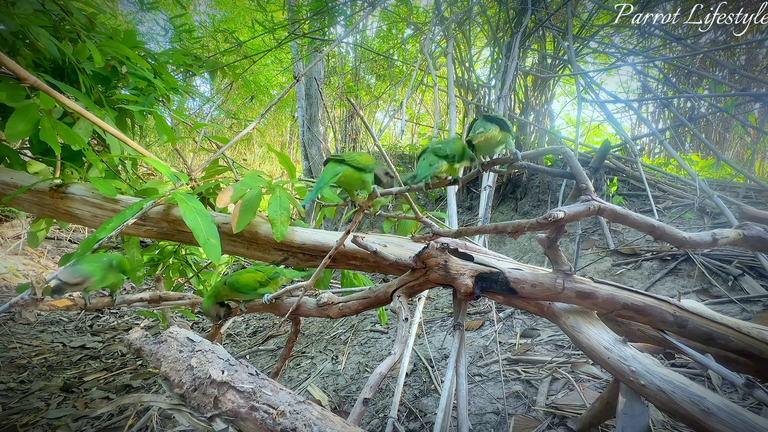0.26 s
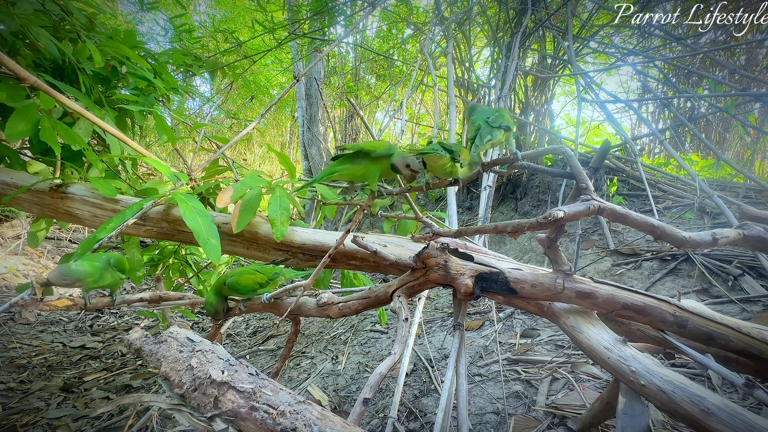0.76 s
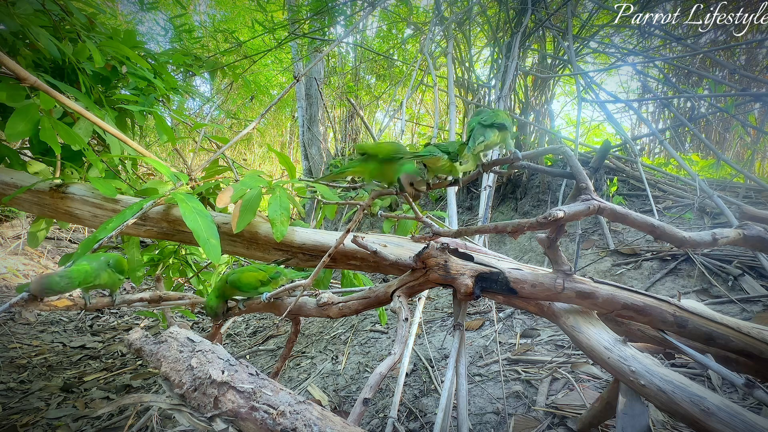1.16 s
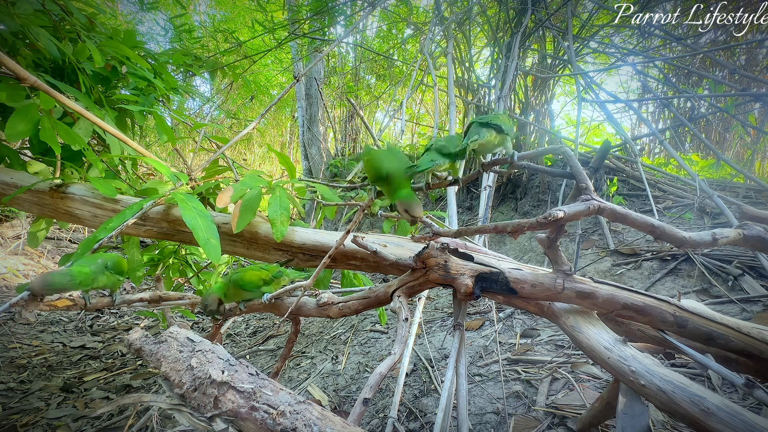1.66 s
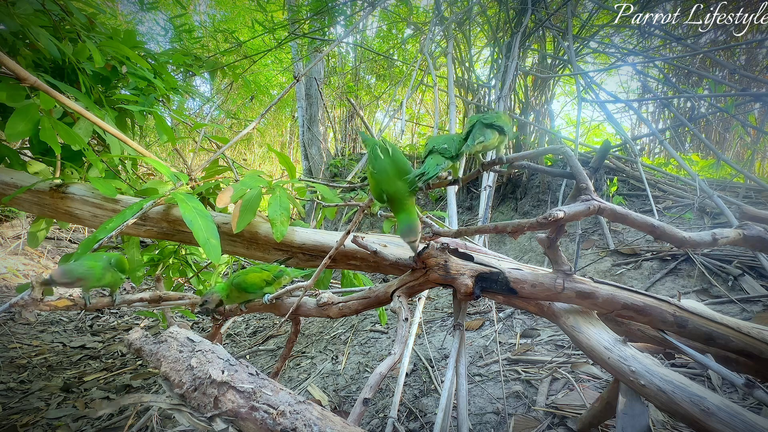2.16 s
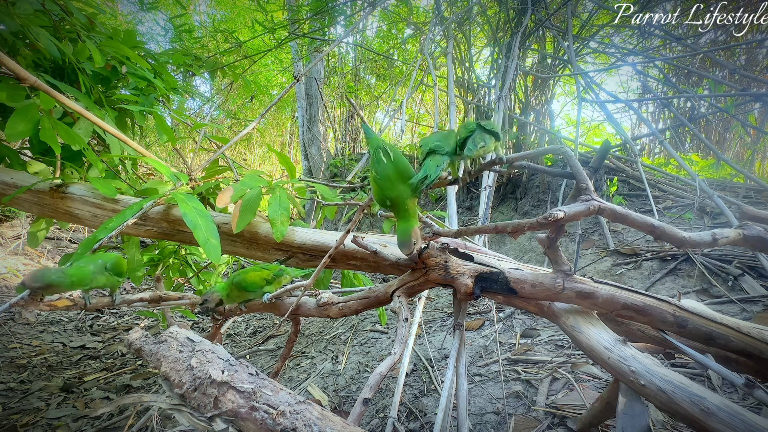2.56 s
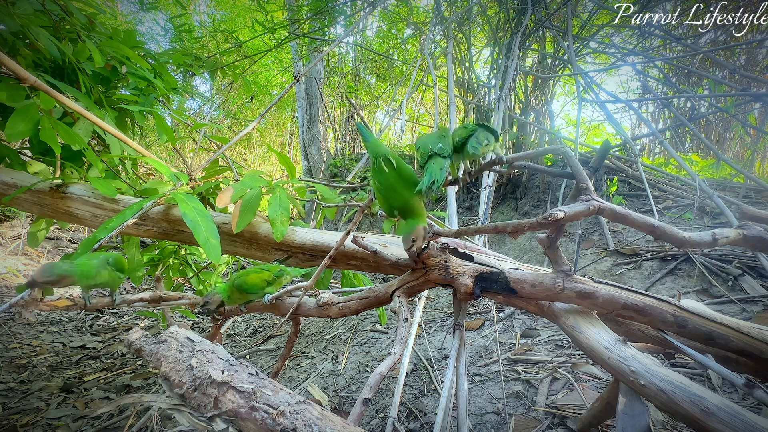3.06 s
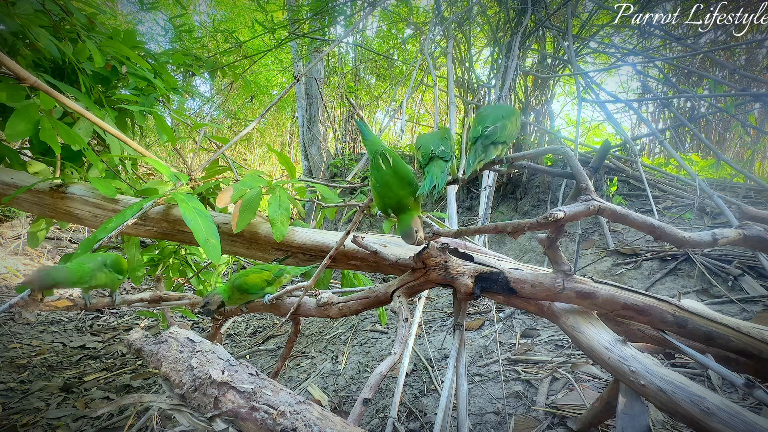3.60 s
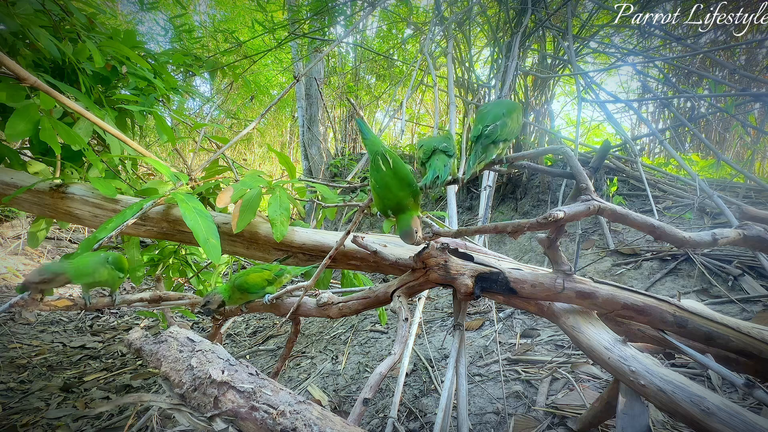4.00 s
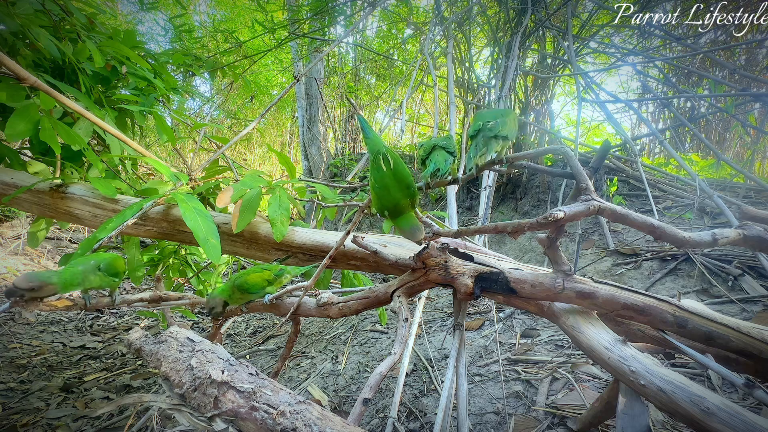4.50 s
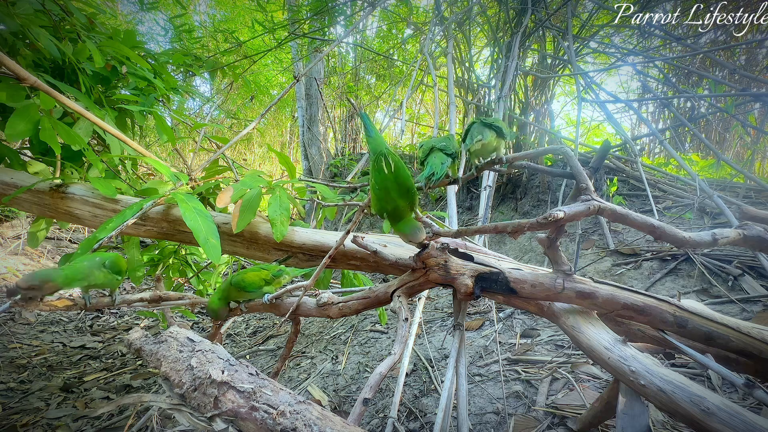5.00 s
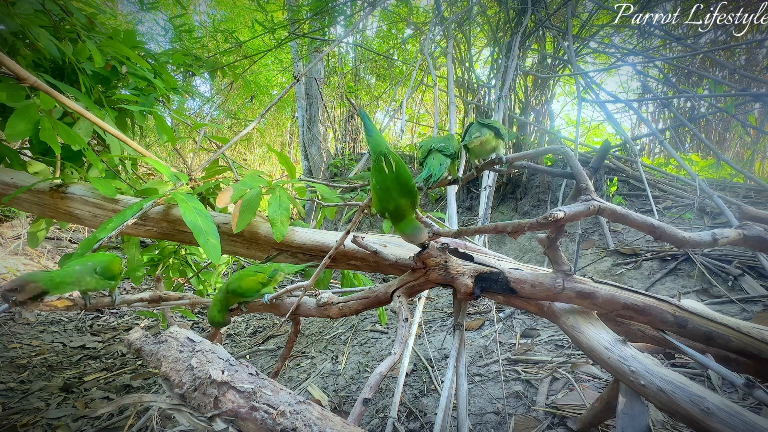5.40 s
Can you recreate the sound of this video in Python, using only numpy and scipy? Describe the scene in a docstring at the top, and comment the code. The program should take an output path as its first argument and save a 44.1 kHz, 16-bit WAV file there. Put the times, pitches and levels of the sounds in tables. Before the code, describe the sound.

Dry twigs and bark tick and snap under clambering small birds, while a thin insect whine warbles steadily over low rumble and air hiss.

```python
"""Two insects hold a high warbling whine over distant rumble and air hiss, with a sparse rustle of claw ticks.
Small parrots clamber on dry branches in a thicket: claws and beaks tick and snap on the wood, a few feet thump.
A far bird peeps now and then. The whine sums overtones of swinging pulse rates; snaps are noise bursts ringing
wood modes; thumps and peeps are gliding sines; air is random spectra. All but thumps and air are scattered."""
import sys
import numpy as np
from scipy import signal
from scipy.io import wavfile
from scipy.ndimage import uniform_filter1d

SR = 44100
rng = np.random.default_rng(int(sys.argv[2]) if len(sys.argv) > 2 else 0)


def store_pcm(level_fs):
    """Save levels as 16-bit WAV."""
    pcm = np.round(np.clip(level_fs, -1, 1) * 32767).astype(np.int16)
    wavfile.write(sys.argv[1], SR, np.atleast_2d(pcm).T)


N = 249165


def gain_of(db):
    """Decibels to an amplitude factor."""
    return 10 ** (np.asarray(db) / 20)


def evened(x):
    """Scales to rms 1."""
    return x / np.sqrt(np.mean(x ** 2) + 1e-20)


def add(mix, start_s, sound):
    """Adds a sound to the mix at a time, cut at the end of the mix."""
    part = mix[round(start_s * SR):][:len(sound)]
    part += sound[:len(part)]


def wander(cutoff_hz):
    """Low-passed noise of rms 1: slow random change."""
    b, a = signal.butter(2, cutoff_hz, fs=SR)
    return evened(signal.lfilter(b, a, rng.standard_normal(N)))


def thicket(x, t60_s, wet_db):
    """Trunks and twigs scatter: one tap of random sign in every 20 samples, dying away."""
    slots = np.arange(100, SR // 2, 20)
    places = slots + rng.integers(0, 20, len(slots))
    signs = rng.choice([-1., 1.], len(slots))
    taps = np.zeros(SR // 2 + 20)
    taps[places] = signs * gain_of(-60 * slots / SR / t60_s)
    scatter = signal.oaconvolve(x, taps / np.linalg.norm(taps))[:N]
    return x + gain_of(wet_db) * scatter


def swaying(x, t60_s, wet_db, period_s):
    """Leaves move, so the scatter drifts slowly between three patterns."""
    t = np.arange(N) / SR
    out = np.zeros(N)
    for k in range(3):
        fade = np.cos(np.pi * (t / period_s + k / 3)) ** 2 * 2 / 3  # the three sum to 1
        out += thicket(x * fade, t60_s, wet_db)
    return out


def insect(rate, leads, warble_per_s, tones, swing_hz, dwell):
    """A pulse rate swings up and down, dwelling at both ends; each overtone's level follows the swing."""
    # overtone: lead [warble cycles], set by each path
    overtone_leads = {4: .15, 5: .04, 6: .08, 7: .17, 8: .1}
    start_hz, drift_hz_per_s = rate
    shake_hz, flicker_db = 1.1, 2.0  # rms
    t = np.arange(N) / SR
    mean_hz = start_hz + drift_hz_per_s * t
    lead = np.interp(t, *np.transpose(leads))
    shake = shake_hz * wander(27.8)  # the pulse rate is never quite steady
    out = np.zeros(N)
    for k, (low_db, middle_db, top_db) in tones.items():
        warble_cycles = warble_per_s * t + lead + overtone_leads[k]
        swing = np.tanh(dwell * np.cos(2 * np.pi * warble_cycles)) / np.tanh(dwell)
        pulses = np.cumsum(mean_hz + swing_hz * swing + shake) / SR
        level_db = np.interp(swing, [-1, 0, 1], [low_db, middle_db, top_db])
        out += gain_of(level_db) * np.cos(2 * np.pi * (k * pulses + rng.random()))
    return out * gain_of(flicker_db * wander(35.7))


def whine():
    """Two insects with close pulse rates warble at their own pace, each scattered by the thicket."""
    # multiple of the pulse rate: (level at the bottom [dB], middle [dB], top [dB] of the swing), before flicker
    upper_tones = {4: (-73, -73, -94), 5: (-41, -54.5, -44.5), 6: (-74, -118, -91), 7: (-92, -66.5, -94)}
    lower_tones = {4: (-71.5, -70, -68.5), 5: (-46, -48, -49), 6: (-70, -109, -76.5), 7: (-72, -75, -69),
                   8: (-82.5, -84, -76.5)}
    # warbles run ahead of or behind a steady beat: (time [s], lead [warble cycles])
    upper_leads = [(0, -.27), (1.6, -.31), (2.4, -.37), (4.2, -.32), (5.65, -.55)]
    lower_leads = [(0, .32), (.7, .33), (2.1, .125), (3.2, .225), (4.0, .15), (4.7, .155), (5.65, .03)]
    # rate: (Hz at the start, drift Hz per s); dwell: squareness of the swing
    upper = insect((1493.6, -.8), upper_leads, warble_per_s=13.0, tones=upper_tones, swing_hz=16.2, dwell=1.4)
    lower = insect((1445.8, .18), lower_leads, warble_per_s=14.5, tones=lower_tones, swing_hz=11.3, dwell=1.7)
    upper_scattered = swaying(upper, t60_s=.35, wet_db=-1.5, period_s=2.46)
    return upper_scattered + swaying(lower, t60_s=.35, wet_db=1.5, period_s=2.666)


def air():
    """Random short-time spectra with soft patches; the rumble comes in lumps."""
    # steady air spectrum: (frequency [Hz], relative level [dB])
    air_spectrum = [(25, -108), (45, -74), (80, -64), (200, -73.5), (400, -78.5), (900, -83), (2500, -83.5),
                    (5000, -84), (6400, -90.5), (7050, -85.5), (7700, -116.5), (9500, -112),
                    (11000, -106.5), (12500, -99.5), (15000, -93.5)]
    patch_db, lump_db = 0.72, 1.57  # rms; lumps fade out above 350 Hz
    frames, hz = N // 256 + 5, np.fft.rfftfreq(1024, 1 / SR)
    real, imag, patches = rng.standard_normal((3, frames, 513))
    patches = evened(uniform_filter1d(uniform_filter1d(patches, 10, 0), 10, 1))
    lumps = evened(uniform_filter1d(rng.standard_normal(frames), 5))[:, None] / (1 + (hz / 350) ** 2)
    points_hz, points_db = np.transpose(air_spectrum)
    steady_db = np.interp(np.log(hz + 1), np.log(points_hz), points_db)
    spectra = (real + 1j * imag) * gain_of(steady_db + patch_db * patches + lump_db * lumps)
    spectra[:, 0] = 0  # no DC
    return gain_of(4.5) * signal.istft(spectra.T, nperseg=1024, noverlap=768)[1][:N]


def rustle():
    """Tiny claw ticks and dry crumbs fall at random, as short decaying sines; the fainter are the more common."""
    per_s, base_db = 40, -78
    size = gain_of(2.0 * np.minimum(rng.exponential(1, N), 3))  # 0 to 6 dB over the base
    strikes = size * (rng.random(N) < per_s / SR)
    kind = rng.integers(0, 12, N)
    t, out = np.arange(300) / SR, np.zeros(N)
    for k, hz in enumerate(np.geomspace(1500, 14000, num=12)):
        tick = np.sin(2 * np.pi * hz * t) * np.exp(-t * hz / 1.5)
        out += signal.oaconvolve(strikes * (kind == k), tick)[:N]
    return gain_of(base_db) * out


def ring(x, hz, width_hz):
    """A two-pole resonance."""
    r = np.exp(-np.pi * width_hz / SR)
    return signal.lfilter([1, 0, -1], [1, -2 * r * np.cos(2 * np.pi * hz / SR), r * r], x)


def snaps():
    """A sharp crack and a short crumble of fibres ring the modes of the wood and a bright tick."""
    # snaps on wood: (time [s], knock [dB], crack [dB], centre of the crack [Hz], tick [dB], crumble decay [s]);
    # each level is the energy spread over 5 ms, before scatter
    snap_table = [(0.492, -56, -60, 3300, -64, 0.0033), (0.5539, -54, -64, 4800, -80, 0.0043),
                  (0.833, -48.5, -40.5, 4330, -44, 0.0028), (0.973, -55.5, -64, 2500, -58, 0.0024),
                  (0.9902, -46, -39, 2070, -43, 0.0015), (1.017, -56, -50, 4460, -56, 0.0048),
                  (1.029, -62, -46, 3700, -64, 0.0017), (1.181, -43, -44, 3300, -54.5, 0.0012),
                  (1.375, -60, -55.5, 4000, -69, 0.0036), (1.422, -67, -53, 4730, -61, 0.0023),
                  (1.497, -65, -50, 4600, -67, 0.0023), (1.852, -70, -59, 4600, -63, .004),
                  (1.883, -60, -76, 2000, -77, .006), (1.962, -65, -57, 4100, -60, 0.0035),
                  (2.045, -76, -53.5, 4280, -49.5, 0.0055), (2.439, -60, -65, 5000, -64, 0.0033),
                  (2.502, -50.5, -56, 3660, -55.5, 0.0023), (2.598, -79, -59, 5400, -56, 0.0033),
                  (2.622, -70, -55, 4500, -52, 0.0023), (2.696, -55, -62, 4700, -62, 0.002),
                  (2.702, -51, -69, 4500, -62, 0.0017), (2.7945, -54.5, -74, 5000, -75, .0034),
                  (3.04, -76, -64, 4200, -63, 0.0036), (3.0645, -71, -52, 3900, -55, 0.003),
                  (3.102, -70, -54, 4000, -59, .003), (3.1308, -57, -35.5, 4500, -39.5, 0.0062),
                  (3.142, -65, -35, 4400, -46, 0.0034), (3.145, -61, -61, 4400, -45, 0.0017),
                  (3.157, -57, -63, 3000, -70, .004), (3.193, -54.5, -58, 3800, -75, 0.012),
                  (3.209, -54, -65, 2300, -70, 0.011), (3.323, -58, -54, 5100, -63, 0.0056),
                  (3.36, -55.5, -47.5, 4770, -46, 0.0028), (4.0066, -56.5, -41.5, 4400, -60, 0.0023),
                  (4.0586, -56, -65, 2700, -67, 0.0056), (4.1634, -52, -47, 4400, -75, 0.0029),
                  (4.302, -55.5, -50.5, 4020, -58, 0.0041), (4.311, -57, -51.5, 4100, -74, .0034),
                  (4.3397, -54, -51.5, 3630, -68, 0.0035), (4.408, -58.5, -59, 2900, -64, 0.0027),
                  (4.543, -76, -60, 4800, -69, 0.0037), (4.925, -65, -36, 3100, -49.5, 0.0011),
                  (5.068, -57, -47, 4800, -59, 0.003), (5.1963, -56, -47, 4870, -45, .0015),
                  (5.1992, -42.5, -36.5, 3800, -41.5, 0.0012), (5.3, -70, -53, 3100, -74, 0.0026),
                  (5.354, -54, -65, 2500, -71, 0.0038), (5.376, -48.5, -37.5, 3300, -54, 0.0024),
                  (5.396, -52.5, -43.5, 4120, -67, .0027), (5.4503, -60, -62, 4700, -61, .004),
                  (5.526, -65, -48.5, 4300, -77, .0035)]
    # what the dry wood rings with: (frequency [Hz], width of one resonance pass [Hz], relative level [dB])
    wood_modes = [(600, 630, -6), (1083, 330, -1), (1484, 840, 0.5), (1950, 260, -3), (2300, 880, 3.5),
                  (2710, 1500, 7), (3300, 360, -4.5), (3800, 780, 4), (4400, 660, -3), (4870, 630, 7),
                  (5400, 1500, 1.5)]
    # modes fade per octave away from where a blow is centred
    knock_hz, knock_fall_db, crack_fall_db = 1264, 19, 22
    uneven_db = 1.2  # rms; every blow lands on another spot
    rise_s = .0004
    tick_cycles = 35  # a longer crumble gives a duller tick: low-pass at this / crumble, kept in 9-20 kHz
    out, t = np.zeros(N), np.arange(1200) / SR
    click = 2.9 * (t == t[round(rise_s * SR)])
    bright = signal.butter(3, 8000, "high", fs=SR, output="sos")
    modes_hz, widths_hz, modes_db = np.transpose(wood_modes)

    for start_s, knock_db, crack_db, crack_hz, tick_db, crumble_s in snap_table:
        noise = rng.standard_normal((len(wood_modes) + 1, len(t)))
        fibres = noise * np.exp(-t / crumble_s) * np.minimum(t / rise_s, 1)
        *blows, tick_blow = fibres + click
        spot = gain_of(modes_db + uneven_db * rng.standard_normal(len(wood_modes)))
        rings = []
        for blow, hz, width_hz in zip(blows, modes_hz, widths_hz):
            once = ring(blow, hz, width_hz)
            rings.append(evened(ring(once, hz, 1.22 * width_hz)))  # twice: steep skirts
        rings = np.array(rings)
        knock = (spot * gain_of(-knock_fall_db * abs(np.log2(modes_hz / knock_hz)))) @ rings
        crack = (spot * gain_of(-crack_fall_db * abs(np.log2(modes_hz / crack_hz)))) @ rings
        soft = signal.butter(2, np.clip(tick_cycles / crumble_s, 9000, 20000), fs=SR, output="sos")
        tick = signal.sosfilt(np.vstack([bright, soft]), tick_blow * np.exp(-t / 0.0031))
        for db, part in ((knock_db, knock), (crack_db, crack), (tick_db, tick)):
            add(out, start_s, gain_of(db) * part * np.sqrt(SR / 200) / np.linalg.norm(part))
    return out


def thumps():
    """A foot lands on a branch; bending waves bring the high part first, so the pitch drops as one over time."""
    # thumps of feet: (time [s], level before the fade [dB], pitch scale [Hz], Gaussian fade to 1/e [s]);
    # the pitch starts at 0.975 of its scale
    thump_table = [(1.784, -41, 2000, .024), (4.257, -46.5, 1500, .03), (4.421, -47, 500, .032),
                   (4.817, -49.5, 600, .0084), (4.996, -43.5, 304, .035), (5.555, -48.5, 1180, .0097)]
    out, t = np.zeros(N), np.arange(4000) / SR
    for start_s, db, scale_hz, fade_s in thump_table:
        cycles = 1.385 * np.log(1 + t * scale_hz / 1.42)
        add(out, start_s, gain_of(db) * np.sin(2 * np.pi * cycles) * np.exp(-(t / fade_s) ** 2))
    return out


def peeps():
    """Short notes, husky from a random phase shake, that sag a little in pitch."""
    # far peeps: (time [s], peak before scatter [dB], starting pitch [Hz], length [s])
    peep_table = [(2.803, -58, 2740, 0.037), (3.373, -60, 2960, 0.045), (4.646, -56, 2900, 0.026),
                  (4.808, -57.5, 2640, 0.027), (4.835, -60, 2430, 0.028), (5.04, -55.5, 2720, 0.032)]
    husk_rad = .4  # rms
    out, husk = np.zeros(N), husk_rad * wander(220)
    for start_s, db, hz, length_s in peep_table:
        t = np.arange(0, length_s, 1 / SR)
        cycles = hz * t * (1 - 0.0036 * t / length_s)
        note = np.sin(2 * np.pi * cycles + husk[round(start_s * SR):][:len(t)])
        add(out, start_s, gain_of(db) * note * signal.windows.tukey(len(t), .6))
    return out


def scene():
    """Insects far in the thicket, birds near, one bird far off, and the air."""
    far_insects = whine()
    near_birds = swaying(snaps() + rustle(), t60_s=0.06, wet_db=-9.5, period_s=0.77) + thumps()
    far_bird = swaying(peeps(), t60_s=0.51, wet_db=-4, period_s=0.26)
    return (near_birds + far_insects + far_bird + air())[None]


def record(dry):
    """The microphone drops the deepest bass; then the band limit."""
    edge_hz = 15780
    lean = signal.sosfilt(signal.butter(6, 45, "high", fs=SR, output="sos"), dry)
    band = signal.firwin(1023, edge_hz, window=("kaiser", 9), fs=SR)
    return signal.oaconvolve(lean, band[None], "same")


dry = scene()
out = record(dry)
store_pcm(out)
```